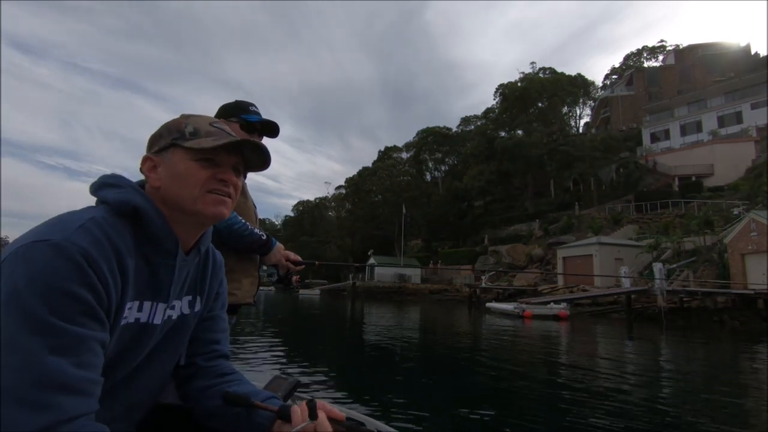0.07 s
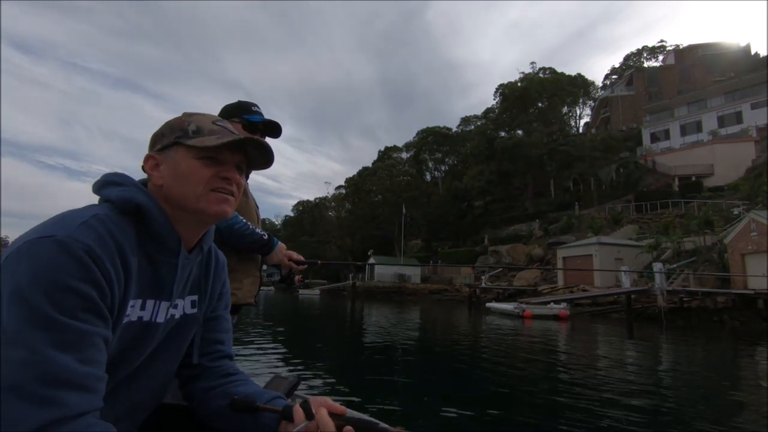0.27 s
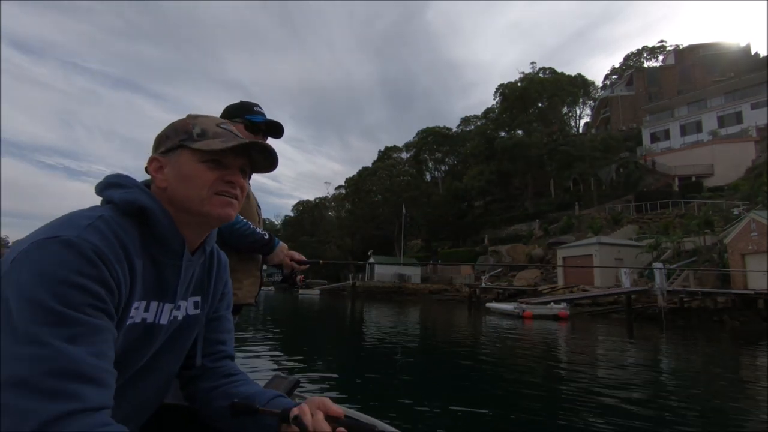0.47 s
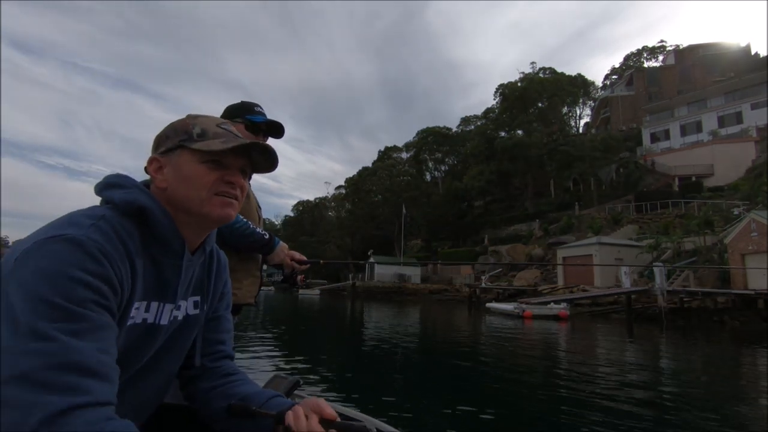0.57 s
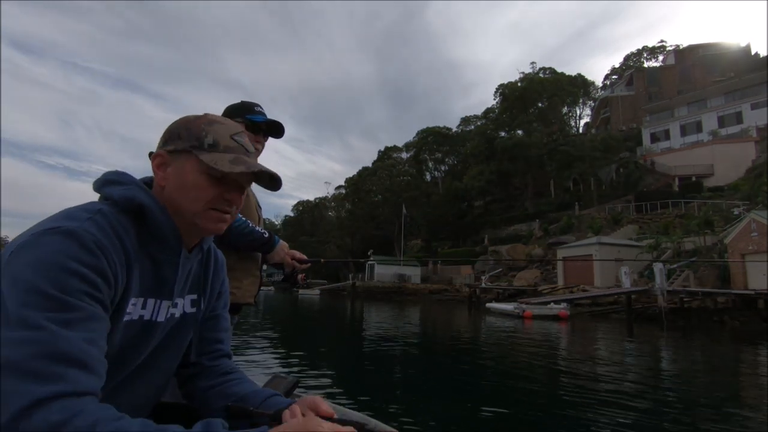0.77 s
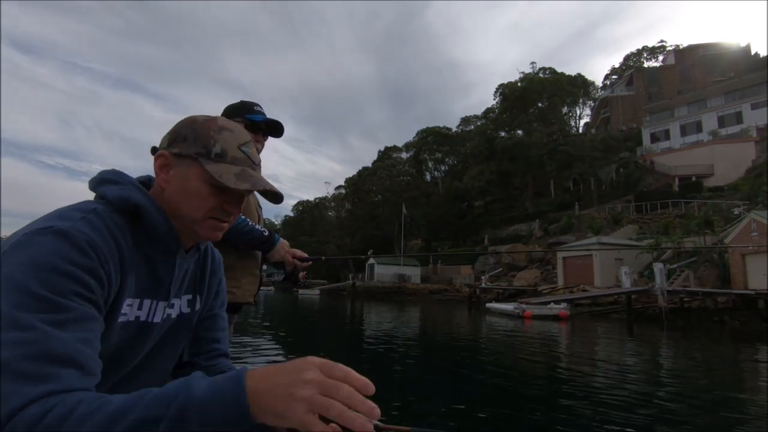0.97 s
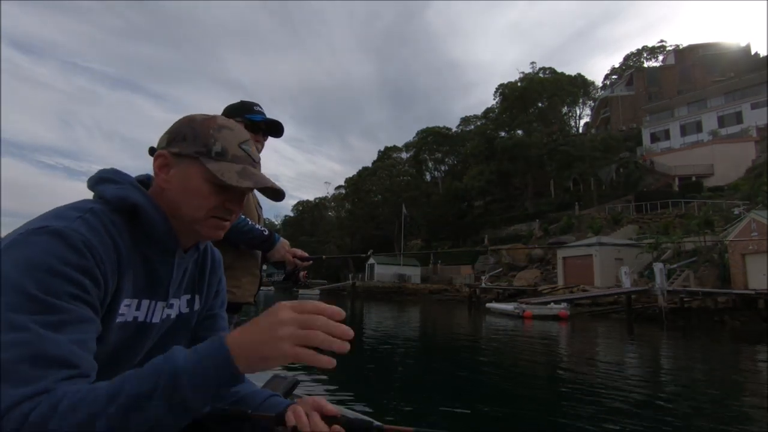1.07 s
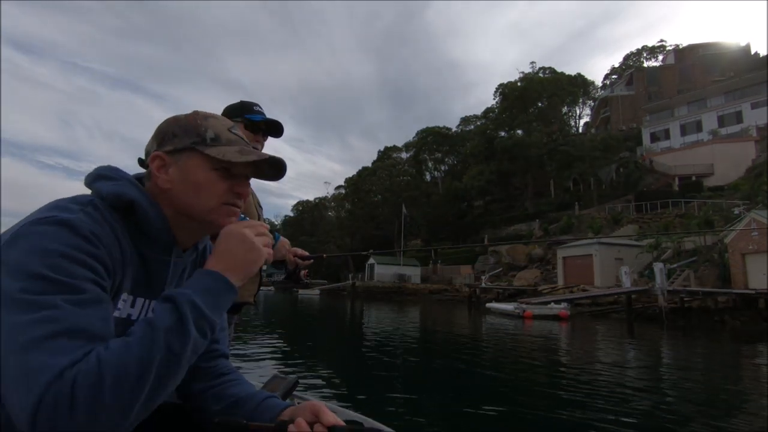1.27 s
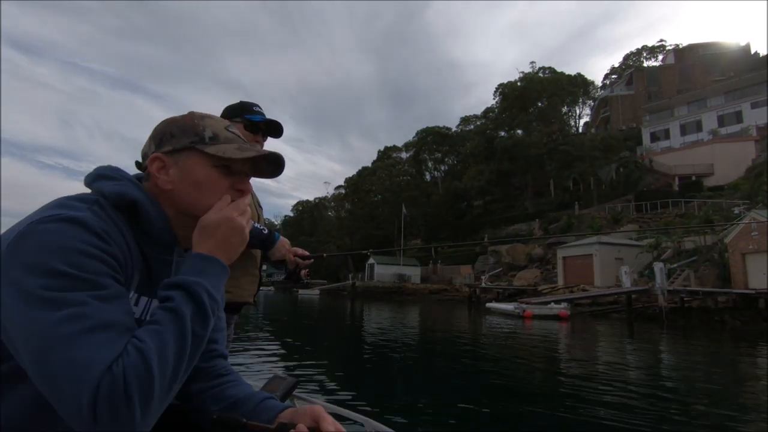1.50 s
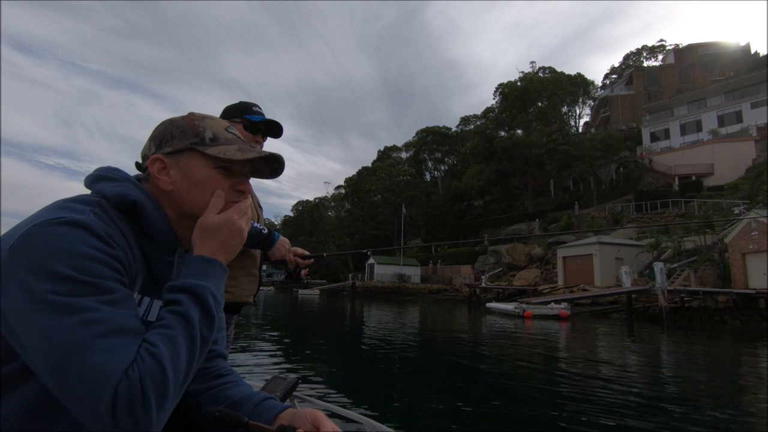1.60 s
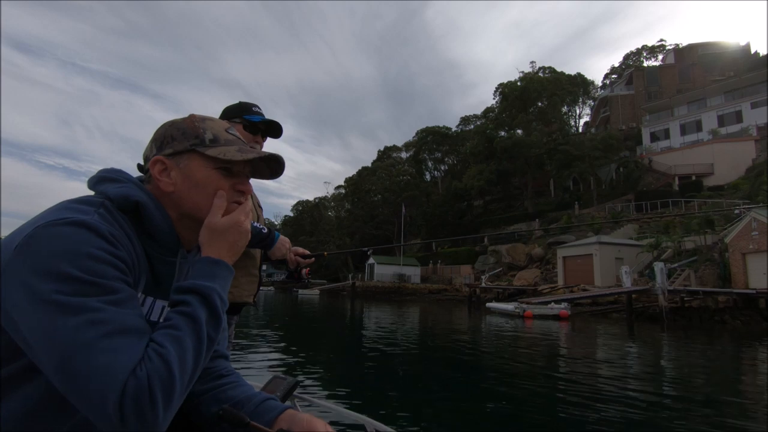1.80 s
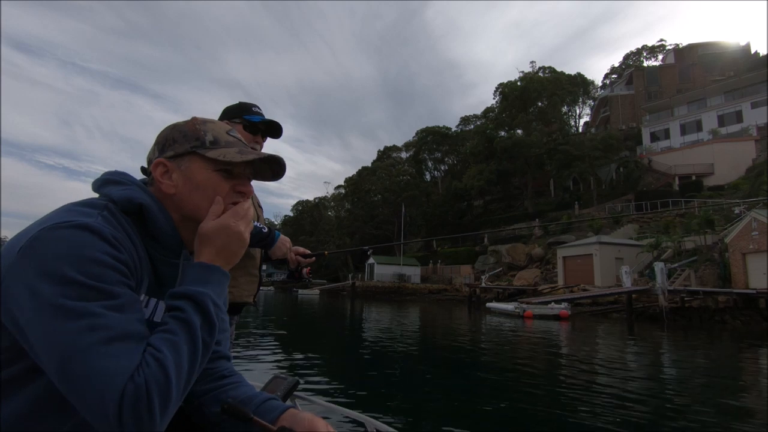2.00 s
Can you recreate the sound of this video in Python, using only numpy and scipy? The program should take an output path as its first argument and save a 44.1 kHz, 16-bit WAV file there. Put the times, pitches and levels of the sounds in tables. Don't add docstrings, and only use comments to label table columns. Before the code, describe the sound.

A fishing reel snaps shut close to the microphone with a fast burst of hard clacks and ticks, then low water rumble, soft wavelet thuds, wind buffets and faint bird whistles on a sheltered bay.

```python
import sys
import numpy as np
from scipy import signal
from scipy.fft import rfft, irfft
from scipy.io import wavfile
from scipy.ndimage import uniform_filter1d

SR = 44100
rng = np.random.default_rng(int(sys.argv[2]) if len(sys.argv) > 2 else 0)


def persist_wave(psi):
    counts = np.round(np.clip(psi, -1, 1) * 32767).astype(np.int16)
    wavfile.write(sys.argv[1], SR, np.atleast_2d(counts).T)


def boost_factor(decibels):
    exponent = np.asarray(decibels, float) / 20
    return 10 ** exponent


N = 90404
T = np.arange(N) / SR

# start_s [s], peak_db [dB], rattle_s [s], struck_spot_hz [Hz]
CLACKS = [(.2075, -29, .0012, 5000), (.2085, -21, .0015, 4500), (.2102, -26, .0015, 4500),
          (.2118, -25, .0012, 3600), (.2130, -25, .0015, 2800), (.2150, -29, .002, 3500),
          (.2174, -31, .0015, 4200), (.2200, -33, .002, 3200), (.2248, -39, .003, 2200),
          (.2326, -33, .001, 4000), (.2335, -18, .001, 3800), (.2350, -22, .001, 3000),
          (.2366, -26, .0012, 3000), (.2382, -30, .0015, 2600), (.2408, -32, .002, 2600),
          (.2425, -33, .002, 2400), (.2452, -37, .002, 3000), (.2532, -31, .001, 4000),
          (.2539, -23, .0012, 3600), (.2548, -26, .0015, 3000), (.2572, -34, .0015, 4500),
          (.2588, -33, .002, 3000), (.2632, -37, .002, 2800), (.2686, -28, .0012, 4900),
          (.2715, -38, .002, 4000), (.2745, -29, .0012, 4800), (.278, -40, .003, 5000),
          (.282, -43, .004, 2500)]
# pitch_hz [Hz], width_hz [Hz], level_db [dB]
REEL_MODES = [(1640, 96, 7.5), (2314, 66, 2), (2964, 183, 4), (3440, 75, 2), (4140, 430, 2.5),
              (4760, 85, 6), (5580, 59, -3.5), (6420, 140, 0.5), (6940, 81, -2.5), (7180, 65, -22.5)]
# start_s [s], peak_db [dB], length_s [s], pitch_hz [Hz], width_hz [Hz]
TICKS = [(.178, -55, .004, 4500, 900), (.1828, -35, .0011, 4700, 1400), (.1831, -44, .001, 3200, 1200),
         (.1836, -56, .0015, 13500, 3000), (.2085, -46, .002, 10200, 600), (.2338, -44, .0015, 10000, 900),
         (.1853, -44, .0015, 4800, 900), (.191, -53, .004, 4900, 900), (.189, -53, .003, 7200, 1500),
         (.195, -44, .003, 1450, 500), (.201, -44, .0015, 2700, 700), (.2035, -45, .004, 4500, 5000),
         (.231, -42, .002, 4500, 4000), (.229, -56, .004, 10300, 900), (.2965, -58, .002, 4000, 1200),
         (.4205, -49, .005, 780, 250), (.2195, -42, .002, 6800, 900)]
PING_STARTS = [
    .2268,
    .250,
]
# start_s [s] (centre of the thud), peak_db [dB], pitch_hz [Hz], length_s [s]
THUDS = [(0.226, -50.5, 45, 0.082), (.80, -40.5, 65.5, 0.0074), (.85, -42.5, 52, 0.038),
         (1.02, -46, 155.3, 0.031), (1.193, -36, 74.4, 0.028), (1.21, -39.5, 184, 0.0098),
         (1.246, -42, 101, 0.016), (.465, -50, 150.6, 0.04), (1.688, -48.5, 52.6, 0.071),
         (1.298, -46.5, 44.8, 0.069), (1.47, -53, 153.6, 0.039), (1.576, -45, 58.2, 0.051),
         (1.748, -39, 81, 0.022), (1.787, -43.5, 83.5, 0.031)]
# start_s [s], level_db [dB]
GUSTS = [(0.0, -68), (0.1, -50), (0.17, -52), (0.2, -51.5), (0.56, -66), (0.67, -48.5), (0.7, -60.5),
         (0.84, -50.5), (0.98, -44.5), (1.01, -55), (1.16, -43.5), (1.19, -33.5), (1.43, -67), (1.44, -58),
         (1.78, -48), (1.88, -55), (1.91, -49.5), (2.05, -53)]
# pitch_hz [Hz], level_db [dB per Hz]
WIND_COLOUR = [(20, -0.5), (40, -4.5), (70, 0), (100, -6), (170, -7.5), (260, -24.5), (400, -57)]
# start_s [s], length_s [s], start_hz [Hz], end_hz [Hz], level_db [dB]
BIRD_NOTES = [(0, .03, 2950, 2930, -71), (.05, .05, 4300, 4150, -76), (1.47, .04, 3950, 3950, -77),
              (1.521, .012, 3350, 3100, -67), (1.535, .055, 2600, 2755, -64),
              (1.585, .055, 2760, 2700, -73), (1.595, .02, 3650, 3800, -70), (1.612, .036, 3900, 4240, -55),
              (1.648, .028, 4200, 4240, -61), (1.848, .04, 2400, 2750, -68), (1.95, .04, 2550, 2450, -76),
              (1.995, .05, 2400, 2500, -75), (1.47, .04, 2650, 2600, -79), (1.825, .02, 4100, 4200, -73),
              (1.862, .012, 4400, 4900, -73)]
OCTAVES_DB = [-5, -30, -30, -8, -7, -5, -30, -35, -35, -12, -30, -30, -30, -30, -30]
RASPS = [1, 1, 2, 2, .6, 1.5, 1.5, .7, 1.5, 9, 6, 6, 4, 4, 8]
# start_s [s], pitch_hz [Hz], level_db [dB]
TRILL = [(1.654, 3600, -68), (1.662, 3150, -63), (1.674, 3200, -63), (1.684, 3450, -53), (1.695, 3050, -66),
         (1.705, 3450, -68), (1.72, 3050, -73), (1.74, 3300, -71), (1.75, 3050, -74), (1.763, 3400, -69),
         (1.785, 2950, -82)]
# pitch_hz [Hz], level_db [dB per Hz]
RUMBLE_COLOUR = [(40, -6.5), (110, -13.5), (165, 3), (220, -3.5), (300, -10.5), (430, -24.5), (600, -26),
                 (1050, -36.5)]
# pitch_hz [Hz], level_db [dB per Hz]
HISS_COLOUR = [(590, -35), (1000, -8.5), (1190, -2.5), (1290, -4), (1790, -5.5), (2590, -9), (4440, -7),
               (7970, -15.5), (15500, -31)]
# pitch_hz [Hz], level_db [dB per Hz]
SWISH_COLOUR = [(1000, -3), (1400, 0), (2100, 4), (3000, -5), (3700, -6.5), (4300, -1.5), (6000, -15.5),
                (8000, -14)]
# start_s [s], level_db [dB]
MOTOR = [(0.0, -64.5), (0.18, -74), (0.21, -59.5), (0.3, -69), (0.46, -65.5), (0.48, -67.5), (0.81, -72.5),
         (1.82, -75.5), (2.05, -74)]

ATTACK_S = .0003
REEL_TOP_HZ, REEL_AIR_HZ = 7800, 10400
KNOCK_HZ, KNOCK_WIDTH_HZ = 520, 620
HISS_DB = -74.5


def reel():
    out = np.zeros(N)
    add_clacks(out)
    add_ticks(out)
    for start in PING_STARTS:
        u = (T - start) / .005
        out += boost_factor(-44) * np.sin(2 * np.pi * 7500 * T) * np.clip(4 * u * (1 - u), 0, 1)
    deck = boost_factor(-9.5) * echo(out, .05, .0025)
    far = boost_factor(-26) * echo(out, .2, .01)
    return out + deck + far


def add_clacks(out):
    rattle = np.array([spray(c[2]) for c in CLACKS])
    spot_hz = np.array(CLACKS)[:, 3:]
    ring = 0
    for hz, width, db in REEL_MODES:
        nearness_db = db - 4 * np.log2(hz / spot_hz) ** 2
        ring = ring + boost_factor(nearness_db) * band(band(rattle, hz, 2 * width), hz, hz / 2)

    strike = abs(T[:rattle.shape[1]] - ATTACK_S) < .5 / SR
    x = rattle + boost_factor(17) * strike
    crack = np.array([band(v, hz, hz * 1.3) for v, hz in zip(x, spot_hz[:, 0])])
    crack = cut(crack, 1100, "high", order=2)
    air = cut(cut(x, REEL_AIR_HZ, "low", order=10), REEL_TOP_HZ - 800, "high")
    knock = band(band(x, KNOCK_HZ, KNOCK_WIDTH_HZ), KNOCK_HZ, KNOCK_WIDTH_HZ)
    fizz = cut(cut(x, REEL_AIR_HZ, "high"), 13800, "low")

    bright_db = 4 * np.log2(spot_hz / 4000)
    hits = cut(level(ring, 0) + level(crack, -3), REEL_TOP_HZ, "low", order=10)
    hits = hits + level(air, -18 + bright_db) + level(knock, -18 - bright_db) + level(fizz, -30)
    filter_lag_s = .0004
    for (start, db, *_), hit in zip(CLACKS, hits):
        add(out, start - filter_lag_s, hit, db)


def add_ticks(out):
    for start, db, length, hz, width in TICKS:
        x = spray(length)
        tone = band(band(x, hz, width), hz, width)
        snap = cut(band(x, hz, min(2 * hz, SR / 3)), REEL_AIR_HZ, "low")
        add(out, start, level(tone, 0) + level(snap, -12), db)


def spray(length):
    t = T[:2600]
    grit = rng.standard_normal(len(t)) * boost_factor(3 * rng.standard_normal(len(t)))
    return grit * np.exp(-t / length) * (1 - np.exp(-t / ATTACK_S))


def add(out, start, hit, db):
    i = int(start * SR)
    out[i:i + len(hit)] += hit * boost_factor(db) / abs(hit).max()


def thuds():
    out = 0
    for start, db, hz, length in THUDS:
        u = (T - start) / length
        sag = 1 - .12 * np.clip(u, -2, 2) / 2
        out = out + boost_factor(db) * np.exp(-2 * u ** 2) * np.cos(2 * np.pi * hz * (T - start) * sag)
    return out


def birds():
    start, hz, db = np.array(TRILL).T
    glide_hz = smooth(np.interp(T, start, hz))
    loudness = smooth(boost_factor(np.interp(T, start, db, left=-140, right=-140)))
    out = whistle(glide_hz, -17, 3) * loudness
    for (start, length, start_hz, end_hz, db), octave_db, rasp in zip(BIRD_NOTES, OCTAVES_DB, RASPS):
        u = np.clip((T - start) / length, 0, 1)
        swell = np.sin(np.pi * u ** .34) ** .4 * (u < 1)
        slide_hz = end_hz + (start_hz - end_hz) * np.exp(-u / .07)
        out += boost_factor(db) * swell * whistle(slide_hz, octave_db, rasp)

    smeared = out * boost_factor(7 * walk(450))
    shore = echo(smeared, .34, .02) * boost_factor(2.5 * walk(90))
    fluttering = out * boost_factor(2.5 * walk(120))
    return fluttering + boost_factor(-8) * shore + flock()


def smooth(v):
    return uniform_filter1d(v, size=150)


def whistle(hz, octave_db, rasp):
    warble = 1 + rasp * .009 * walk(700)
    phase = 2 * np.pi * np.cumsum(hz * warble) / SR
    return np.sqrt(2) * (np.sin(phase) + boost_factor(octave_db) * np.sin(2 * phase))


def flock():
    hz, width = 3770, 2150
    chatter = level(band(band(rng.standard_normal(N), hz, width), hz, width), -73)
    u = np.clip((T - 1.49) / .72, 0, 1)
    return chatter * np.sin(np.pi * u ** .5) * boost_factor(2 * walk(42.95))


def wind():
    return coloured(WIND_COLOUR, 3.8, 14.54) * boost_factor(gust_db() - 3)


def gust_db():
    return np.interp(T, *np.array(GUSTS).T)


def bay():
    swish_db = -65.5 - 60 * T / 2.54
    swish = coloured(SWISH_COLOUR, 3.3, 25) * boost_factor(swish_db)
    rumble_db = -56 + .074 * (gust_db() + 56.5)
    rumble = coloured(RUMBLE_COLOUR, 1.43, 6.86) * boost_factor(rumble_db)
    hz, width = 764, 204
    motor = level(band(band(rng.standard_normal(N), hz, width), hz, 2 * width), 0)
    motor = motor * boost_factor(np.interp(T, *np.array(MOTOR).T))
    hiss = coloured(HISS_COLOUR, .42, 19) * boost_factor(HISS_DB)
    return rumble + motor + hiss + swish


def coloured(table, flicker_db, rate):
    hz, db = np.array(table).T
    f = np.maximum(np.arange(N // 2 + 1) * SR / N, 1)
    colour_db = np.interp(np.log(f), np.log(hz), db, left=-90, right=-90)
    spectrum = rfft(rng.standard_normal(N)) * boost_factor(colour_db)
    out = 0
    for octave in np.arange(4, 15, .5):
        share = np.clip(1 - 2 * abs(np.log2(f) - octave), 0, 1)
        out = out + irfft(spectrum * share, N) * boost_factor(flicker_db * walk(rate))
    return level(out, 0)


def walk(rate):
    k = int(SR / rate)
    steps = np.repeat(rng.standard_normal(N // k + 1), k)
    return 1.21 * uniform_filter1d(uniform_filter1d(steps, k), k)[:N]


def echo(x, t60, late):
    t = T[:int(SR * .8)]
    tail = rng.standard_normal(len(t)) * boost_factor(-60 * t / t60) * (1 - np.exp(-t / late))
    return signal.fftconvolve(x, tail / np.sqrt(np.sum(tail ** 2)))[:N]


def level(x, db):
    return _scaled(x, db)


def _scaled(x, db):
    rms = np.sqrt(np.mean(x ** 2, axis=-1, keepdims=True))
    return x * boost_factor(db) / rms


def band(x, hz, width):
    return signal.lfilter(*signal.iirpeak(hz, hz / width, fs=SR), x)


def cut(x, hz, kind, order=4):
    return signal.sosfilt(signal.butter(order, hz, kind, fs=SR, output="sos"), x)


def scene():
    clacks = reel()
    mid = clacks + thuds() + birds() + wind() + bay()
    late = np.roll(clacks, shift=40)
    top_noise = cut(cut(rng.standard_normal(N), 11300, "high", order=8), 14800, "low")
    side = level(top_noise, -98)
    side += level(cut(rng.standard_normal(N), 3000, "high"), HISS_DB - 24.5)
    side += boost_factor(-27.5) * cut(late, 5100, "high")
    side += boost_factor(-7) * cut(late, REEL_AIR_HZ + 600, "high", order=8)
    side += boost_factor(-19.5) * cut(late, 870, "low")
    return np.array([mid + side, mid - side])


def top_cut(x):
    return signal.sosfilt(signal.butter(12, 15690, fs=SR, output="sos"), x)


def record(dry):
    heard = cut(dry, 15500, "low", order=16)
    return top_cut(heard)


dry = scene()
out = record(dry)
persist_wave(out)
```